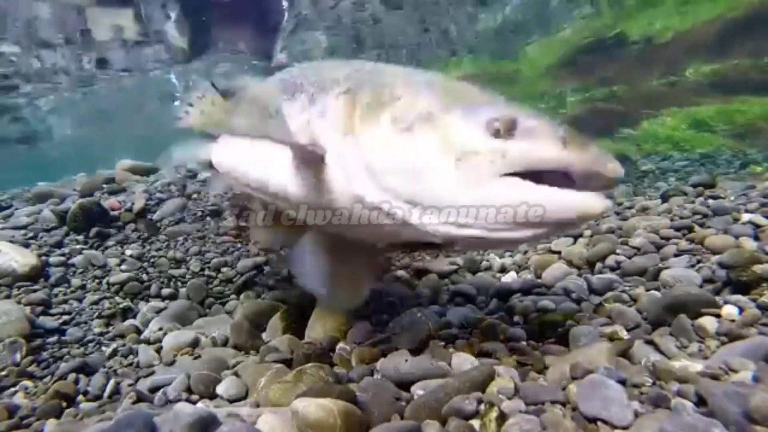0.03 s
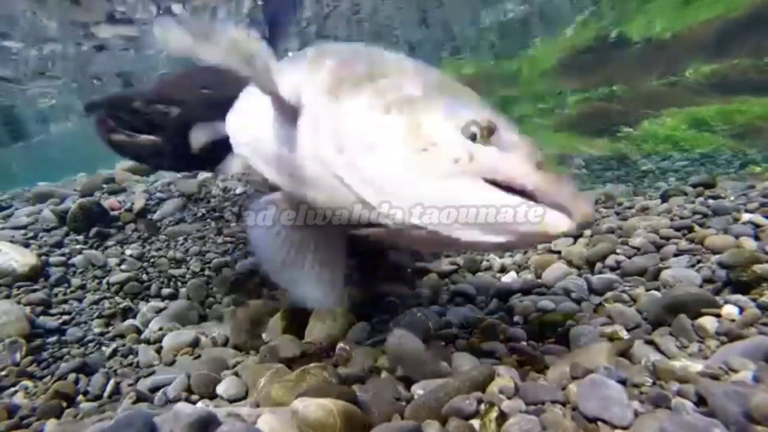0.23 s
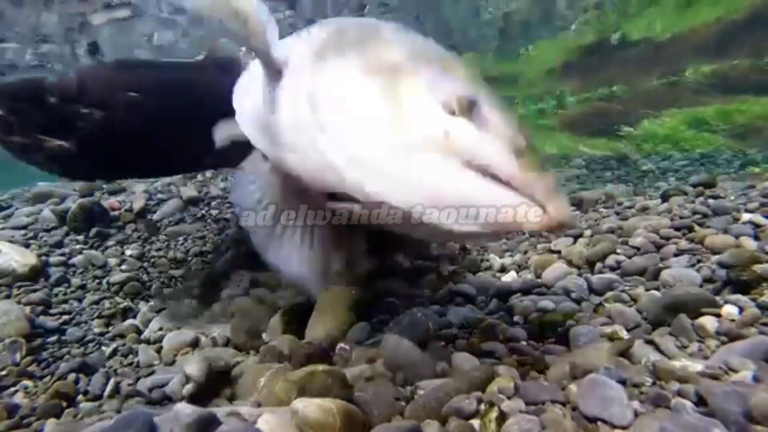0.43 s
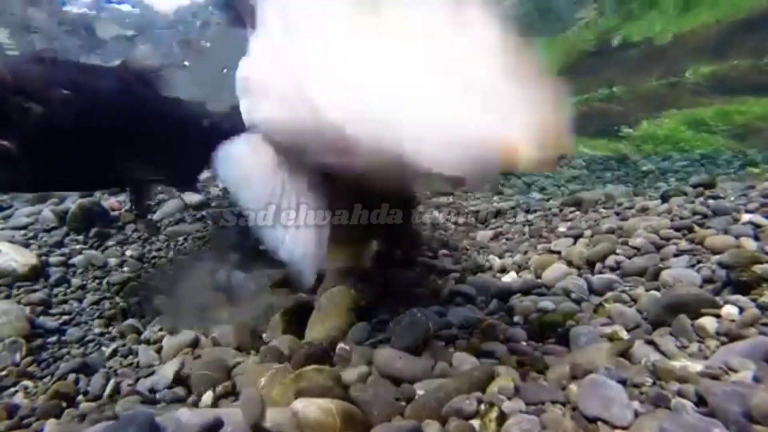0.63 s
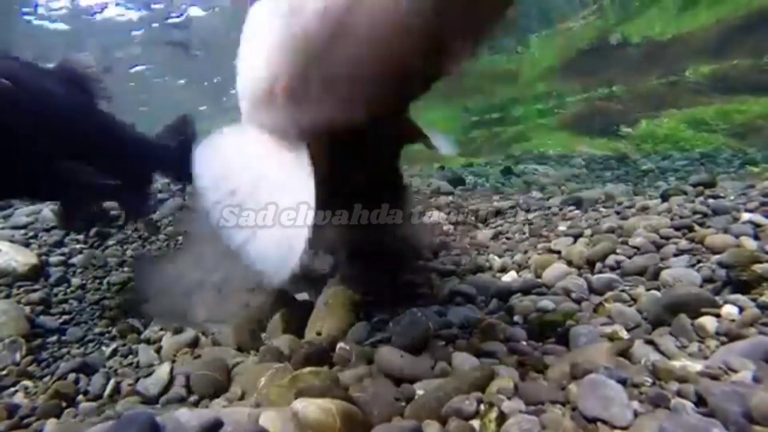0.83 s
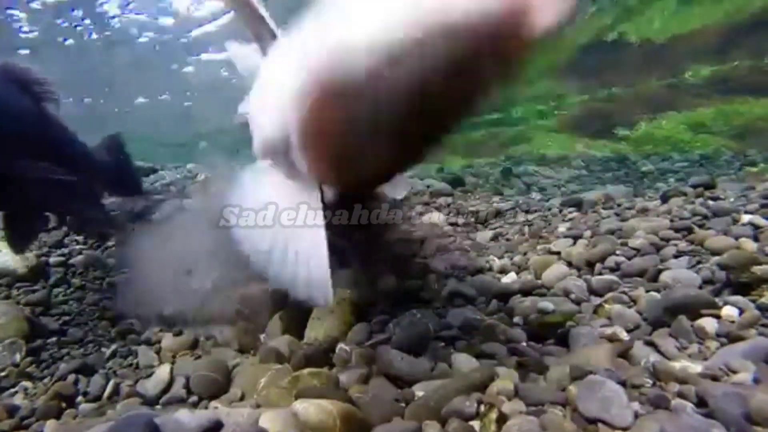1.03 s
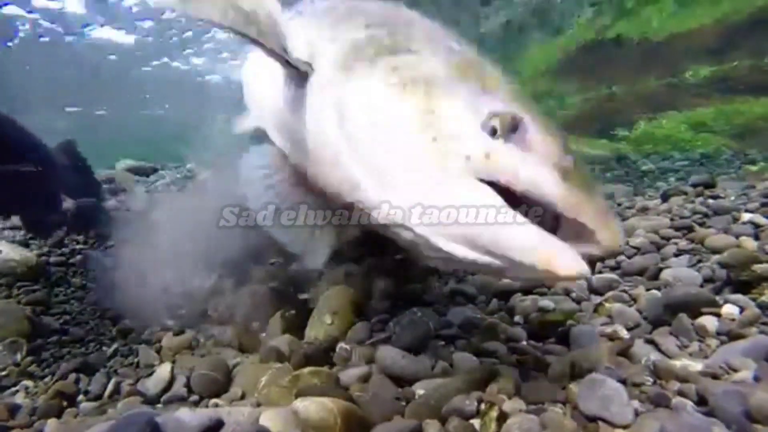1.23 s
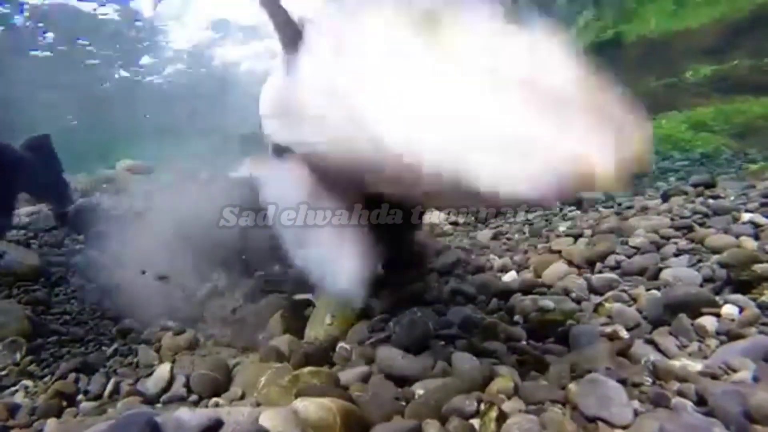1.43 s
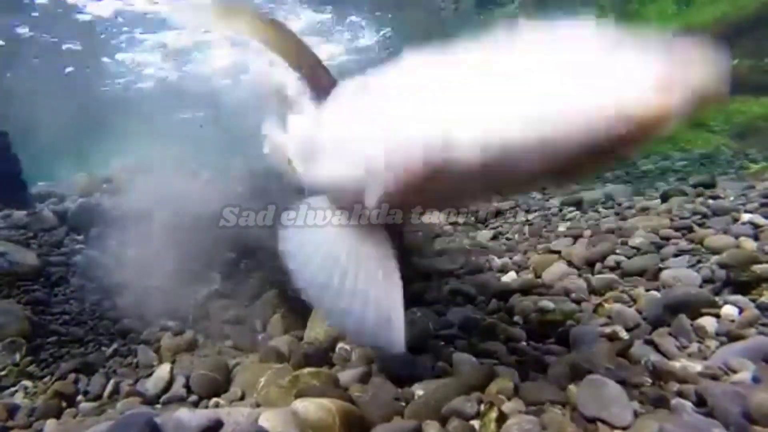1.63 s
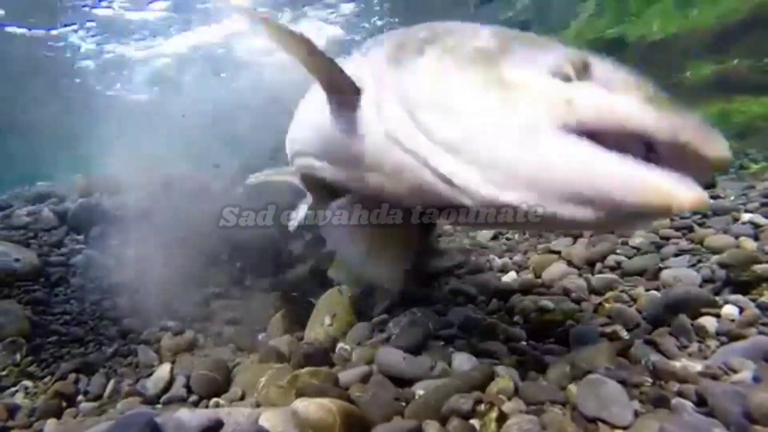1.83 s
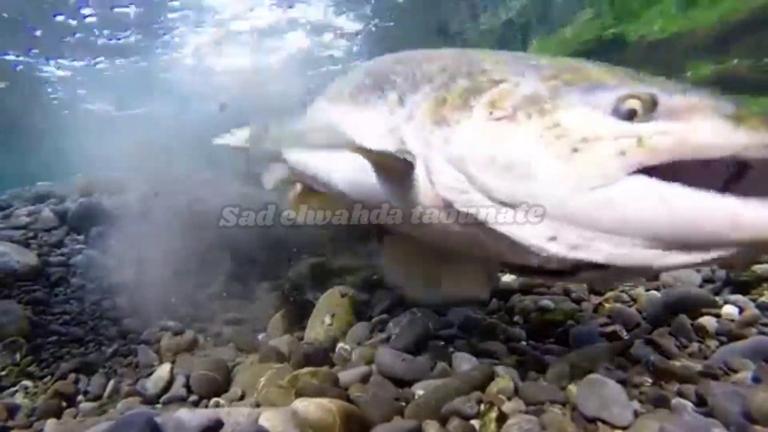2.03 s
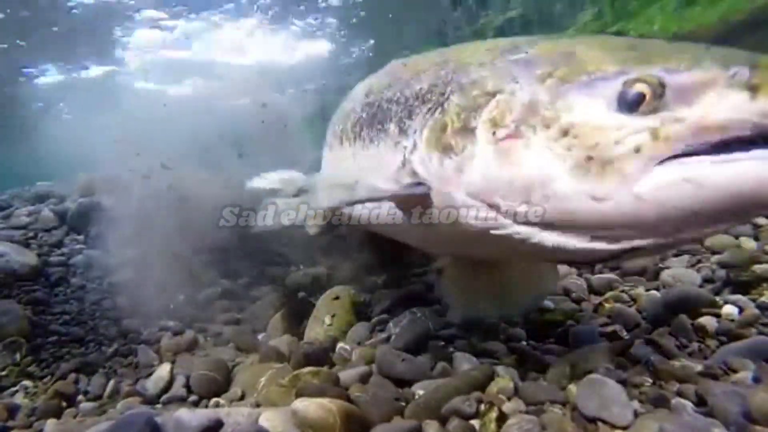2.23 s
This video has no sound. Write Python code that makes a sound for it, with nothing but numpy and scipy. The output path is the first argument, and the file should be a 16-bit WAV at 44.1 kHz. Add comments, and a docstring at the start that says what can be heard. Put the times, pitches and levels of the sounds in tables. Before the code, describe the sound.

Pebbles clacking and crunching underwater as a big fish beats its tail over them.

```python
"""A soft river rumble and shifting gravel, heard under water through a sealed camera housing.
A big fish beats its tail over the pebble bed. Each beat pushes a low surge past the housing and
stirs the gravel: fine grit rustles and ticks, a few heavy stones knock, pebbles clack.
Pebbles and grit ring the housing's resonances; the heavy stones have two hollow modes of their own.
Now and then a bubble blips over a faint gurgle."""
import sys
import numpy as np
from scipy import signal
from scipy.fft import rfft, irfft
from scipy.io import wavfile

SR = 44100
rng = np.random.default_rng(int(sys.argv[2]) if len(sys.argv) > 2 else 0)


def persist_wave(psi):
    """Save psi, clipped to +-1, as 16-bit WAV."""
    counts = np.round(np.clip(psi, -1, 1) * 32767).astype(np.int16)
    wavfile.write(sys.argv[1], SR, np.atleast_2d(counts).T)


N = 101429
TIME = np.arange(N) / SR


def from_db(db):
    """Decibels to gain."""
    return 10 ** (np.asarray(db) / 20)


def unit_rms(x):
    """Scale to unit rms."""
    return x / np.sqrt(np.mean(x ** 2) + 1e-20)


def curves(rows):
    """Interpolate each column after the time column to every sample."""
    time_s, *columns = np.transpose(rows)
    return [np.interp(TIME, time_s, column) for column in columns]


def filtered(x, hz, kind, order=2):
    """Causal Butterworth filter."""
    sos = signal.butter(order, np.clip(hz, 10, .45 * SR), kind, fs=SR, output="sos")
    return signal.sosfilt(sos, x + 1e-18)


def noise(hz, kind, order=2):
    """Filtered noise at unit rms."""
    return unit_rms(filtered(rng.standard_normal(N), hz, kind, order))


def ring(x, modes):
    """Parallel band-pass resonances."""
    return sum(from_db(db) * filtered(x, [hz - width_hz / 2, hz + width_hz / 2], "band")
               for hz, width_hz, db in modes)


def impulses(start_s, db):
    """One impulse per contact."""
    out = np.zeros(N)
    samples = np.clip(np.round(start_s * SR).astype(int), 0, N - 1)
    np.add.at(out, samples, from_db(db))
    return out


def grains(per_s, spread_db):
    """Random impulses, many small and a few large."""
    sizes = from_db(spread_db * np.minimum(rng.exponential(1, N), 3.4))
    signs = rng.choice([-1, 1], N)
    return sizes * signs * (rng.random(N) < per_s / SR)


def scattered(hits, spray_db, t60_s):
    """Each hit trails a short random spray of reflections off nearby stones."""
    decay = from_db(-120 / (t60_s * SR))
    power = signal.lfilter([0, 1 - decay], [1, -decay], hits ** 2 + 1e-18)
    return hits + from_db(spray_db) * np.sqrt(power) * rng.standard_normal(N)


# Each row: frequency in Hz, relative spectral density in dB.
CURRENT_SPECTRUM = [(20, -17), (40, -2), (65, 1), (130, -5.5), (200, -18), (350, -20), (900, -24.5),
                    (3000, -39), (15000, -27.5)]
# Each row: time in seconds, relative level in dB.
CURRENT_LEVELS = [(0, -3.5), (.15, -6.5), (.3, 4), (1.0, 0), (1.8, 1.5), (2.3, -6.5)]

def current(gain_db=-43.5):
    """The river rumbles softly along the housing."""
    hz, db = np.transpose(CURRENT_SPECTRUM)
    bins_hz = np.fft.rfftfreq(N, 1 / SR)
    colour = from_db(np.interp(np.log(bins_hz + 1), np.log(hz), db))
    rumble = unit_rms(irfft(colour * rfft(rng.standard_normal(N)), N))
    flow_db, = curves(CURRENT_LEVELS)
    return from_db(gain_db + flow_db) * rumble


def varied(drive, spread_db=2.5, rate_hz=95):
    """The drive of a resonance changes from contact to contact."""
    return drive * unit_rms(from_db(spread_db * noise(rate_hz, "low")))


# Each row: centre in Hz, width in Hz, gain in dB.
HOUSING_HIGH_MODES = [(3810, 240, -3.5), (4164, 264, -4.5), (4950, 384, -3.5), (6974, 1240, -8),
                      (8640, 490, -10.5), (9840, 590, -8.5), (11700, 1340, -10), (13800, 1300, -18)]

def housing_treble(drive):
    """The housing's high resonances, each struck with its own strength."""
    return sum(ring(varied(drive), [mode]) for mode in HOUSING_HIGH_MODES)


# Each row of both: centre in Hz, width in Hz, gain in dB.
HOUSING_BODY_MODES = [(680, 203, -13.5), (1406, 229, 0.5), (1634, 62, -2), (1763, 152, 3.5)]
HOUSING_MAIN_MODES = [(2503, 174, 0), (2905, 280, 0.5)]

def housing(body, lower, upper, edge):
    """The housing rings: body, lower and upper main mode, and treble, each driven separately."""
    main = ring(lower, HOUSING_MAIN_MODES[:1]) + ring(upper, HOUSING_MAIN_MODES[1:])
    return ring(body, HOUSING_BODY_MODES) + main + housing_treble(edge)


GRIT_HIGHPASS_HZ = 5500
# Each row: time in seconds, relative crunch level in dB, relative grit level in dB.
GRAVEL_LEVELS = [(0, -50, -61), (.06, -53.5, -51), (.1, -54.5, -64), (.15, -46, -46.5), (.22, -38.5, -46.5),
                 (.33, -37.5, -40), (.45, -29.5, -37.5), (.58, -29, -35.5), (.69, -31, -37.5),
                 (.77, -38.5, -42), (.88, -31, -46), (1.0, -36.5, -50.5), (1.1, -31.5, -43),
                 (1.25, -37.5, -49.5), (1.34, -34, -36.5), (1.48, -33, -43), (1.66, -34.5, -44),
                 (1.8, -34, -56), (1.92, -36.5, -37.5), (1.97, -38.5, -44), (2.06, -39, -43.5),
                 (2.3, -42, -52)]

def gravel(crunch_db, grit_db, stir_db):
    """Small stones crunch and sand rustles in spurts; harder stirring makes more contacts."""
    density = from_db(0.39 * stir_db)
    small = grains(per_s=1500 * density, spread_db=5.5) / np.sqrt(density)
    small = scattered(small, spray_db=-4.5, t60_s=0.03)
    sand = grains(per_s=2300 * density, spread_db=6.5) / np.sqrt(density)
    sand = scattered(sand, spray_db=2.0, t60_s=0.0084)
    crunch = unit_rms(housing(from_db(-6) * small, varied(small), varied(small), from_db(-9) * small))
    spurts = from_db(3.5 * noise(hz=24.5, kind="low"))
    grit = unit_rms(spurts * housing_treble(filtered(sand, GRIT_HIGHPASS_HZ, "high")))
    return from_db(crunch_db + 2.5) * crunch + from_db(grit_db + 0.5) * grit


# Each row: centre in seconds, swell in Hz, swell level in dB, churn level in dB, half length in seconds.
TAIL_BEATS = [(0.07, 35.6, -32.5, -42, 0.013), (0.256, 27, -31, -35, 0.038),
              (0.46, 26.2, -23.5, -29.5, 0.024), (0.671, 25, -26.5, -29.5, 0.032),
              (0.92, 27.4, -28, -34.5, 0.016), (1.183, 24, -30.5, -33.5, 0.024),
              (1.282, 63, -36.5, -39, 0.023), (1.467, 22, -31, -32, 0.023), (1.526, 63, -31, -38, 0.02),
              (1.839, 79, -22.5, -30, 0.011), (2.264, 71, -36, -51, 0.016)]

def tail_beats(wake_db=-11.5, wake_s=0.12, churn_hz=(52, 141)):
    """Each beat is a pressure swell with churning water and a dying wake; a quick one thumps."""
    swell, churn_power = 0, 0
    for centre_s, hz, swell_db, churn_db, half_s in TAIL_BEATS:
        t = TIME - centre_s
        push = np.exp(-.5 * (t / half_s) ** 2)
        swell -= from_db(swell_db) * push * np.cos(2 * np.pi * hz * t)
        wake = from_db(wake_db) * (t > 0) * np.exp(-np.abs(t) / wake_s)
        churn_power += from_db(churn_db) ** 2 * (push ** 2 + wake ** 2)
    eddies = noise(churn_hz, "band", order=3)
    return swell + np.sqrt(churn_power) * eddies


def gurgle(stir_db, gain_db=-50):
    """Small bubbles ring in the wake, louder as the gravel is stirred harder."""
    pitches_hz = np.geomspace(534.5, 767, 10)
    per_s, width_hz = 1200 / len(pitches_hz), 85
    swarm = sum(ring(grains(per_s, spread_db=6.0), [(hz, width_hz, 0)]) for hz in pitches_hz)
    return from_db(gain_db + 0.84 * stir_db) * unit_rms(swarm)


# Each row: start in seconds, pitch in Hz, level in dB, 60 dB decay time in seconds.
BUBBLE_BLIPS = [(0.116, 2350, -20, 0.014), (.116, 614, -28.5, 0.17), (.217, 536, -31, 0.043),
                (1.376, 639, -27, 0.092), (1.428, 1790, -29, 0.039), (1.455, 505, -23.5, 0.047),
                (1.546, 1760, -16.5, 0.032), (1.838, 11300, -17.5, 0.028), (2.124, 7700, -37, .05),
                (2.193, 13100, -35, .025), (2.243, 575, -26, 0.031)]

def bubbles(attack_s=0.0019, sag=0.19, sag_s=0.015, rise_per_s=3.9):
    """Single bubbles ring: the pitch starts high, settles, then creeps up."""
    out = 0
    for start_s, hz, db, t60_s in BUBBLE_BLIPS:
        age_s = np.maximum(TIME - start_s, 0)
        settle = sag * sag_s * (1 - np.exp(-age_s / sag_s))
        creep = .5 * rise_per_s * age_s ** 2
        cycles = hz * age_s + min(hz, 767) * (settle + creep)  # high blips bend proportionally less
        envelope = (1 - np.exp(-age_s / attack_s)) * from_db(-60 * age_s / t60_s)
        out += from_db(db) * envelope * np.sin(2 * np.pi * cycles)
    return out


# Each row: start in seconds, relative level in dB.
GRIT_TICKS = [(0.1365, -36), (0.2157, -22.5), (0.3493, -29), (0.506, -24.5), (0.68, -25), (0.702, -23),
              (0.9886, -23), (1.3412, -24), (1.4113, -21), (1.461, -18), (1.5543, -21), (1.61, -17),
              (1.9031, -29.5), (1.9973, -19.5), (2.0658, -23), (2.0747, -26), (2.125, -27)]

def grit_ticks(gain_db=24.5):
    """Chips of grit tick against the housing: dry, bright, without body."""
    start_s, db = np.transpose(GRIT_TICKS)
    hits = scattered(impulses(start_s, db + gain_db), spray_db=-0.5, t60_s=0.008)
    return housing_treble(filtered(hits, GRIT_HIGHPASS_HZ, "high"))


# Each row: centre in Hz, width in Hz, gain in dB.
STONE_MODES = [(393, 210, -3), (651, 107, 3)]
# Each row: start in seconds, relative level in dB.
STONE_KNOCKS = [(.221, -27), (.628, -5), (.643, -7), (.7205, -1), (.922, -10), (1.011, -10), (1.021, -1.5),
                (1.266, -4), (1.28, -16), (1.494, -5.5), (1.816, -3.5)]

def stone_knocks(gain_db=14.5):
    """Heavy stones tip over with a hollow knock."""
    start_s, db = np.transpose(STONE_KNOCKS)
    hits = scattered(impulses(start_s, db + gain_db), spray_db=-7.5, t60_s=0.04)
    return ring(hits, STONE_MODES)


# Each row: start in seconds, relative main ring level in dB, upper over lower mode in dB,
# body over main ring in dB, edge over main ring in dB.
PEBBLE_CLACKS = [(0.2213, -24, 6, 3.5, -22), (0.2812, -19, 2, -3.5, -13.0), (0.3646, -5, 0, -8.5, -20),
                 (0.49, -19.5, 12, 8.5, -0.5), (0.5381, 0.5, 5.5, -4.5, -12.5), (0.579, -6.5, 7, -17, -12),
                 (0.5834, -9.5, 6.0, -3, -8.0), (0.6044, -2.0, 0.5, -9, -15), (0.6109, -10.5, 12, -2, -20),
                 (0.626, -9.5, 7, -13, -14.5), (0.6295, -7.5, 5, -7, -16), (0.6356, -10, 2.0, -8, -19),
                 (0.6423, -8.5, -2, 0, -23), (0.689, -8.5, 11, -8, -15.5), (0.7206, -9.5, -8, -10, -37),
                 (0.7233, -0.0, 4, -10, -28), (0.7342, -11, 7, -7, -10), (0.7458, -0.5, -0.5, -3.5, -21.0),
                 (0.7764, -12.5, 3, -4.5, -20), (0.8018, -4.0, -2, -5.5, -14.0),
                 (0.812, -14.0, -3, 0.5, -9.5), (0.8402, -2.5, 7, -7, -17), (0.8456, -7.0, 6.5, -3.5, -25),
                 (0.9232, -12.5, -2, 1.5, -30), (0.994, -12.5, 3.0, -7, -8.5), (1.0124, -14, -2, -2, -22),
                 (1.0225, -8.5, -4, -4.5, -15), (1.0611, -3.0, -1.5, -3.5, -15.5), (1.0729, -3, 3, -4, -19),
                 (1.104, -9.0, 4, -9, -14), (1.1128, -8.0, 1.5, -7.5, -17.5), (1.1584, -12.5, -2, -13, -17),
                 (1.217, -11, -2, -5, -31.5), (1.2665, -10, -6, -2, -37), (1.2803, -10.5, 0.5, -5.0, -32.5),
                 (1.3265, -21, -4.0, -5, -8), (1.3568, -12.5, -2.0, -3.5, -10.5),
                 (1.4774, -13, 5, -3.5, -8.5), (1.4874, -8.5, -8, 0, -10), (1.4916, -5, 6, -6.5, -14),
                 (1.5069, -5, -3, -6.5, -29), (1.5891, -2.5, 4, -6.5, -18.5),
                 (1.6003, -9.0, -10, -0.5, -15), (1.6164, -12.5, 2, -2.0, -4), (1.6359, -3, -2, -6.5, -11),
                 (1.6393, -16, 8, 6.5, -11), (1.685, -14, 7, -6, -14.0), (1.7099, -12.5, 6, -1.5, -7),
                 (1.721, -22, 12.0, -10, -5.5), (1.7582, -17, 11, -0.5, -6), (1.805, -16.5, 14, 1, -29),
                 (1.818, -12, 16, -5, -14.5), (1.8302, -9, 8, -10, -23), (1.9216, -25, 8, -6, -0.5),
                 (1.9406, -19.0, 5, -3.5, 0.5), (2.0149, -4, 3.5, -8, -13), (2.1509, -21.5, 1, -5, -7.5),
                 (2.281, -16.0, -5, -4, -19.0)]

def pebble_clacks(gain_db=26.5):
    """Pebbles ring the housing: beating modes near 2.5 and 2.9 kHz, a lower body, a sharp edge."""
    start_s, db, tilt_db, body_db, edge_db = np.transpose(PEBBLE_CLACKS)
    body = scattered(impulses(start_s, db + body_db), spray_db=-8, t60_s=0.019)
    lower = scattered(impulses(start_s, db - tilt_db / 2), spray_db=-6.5, t60_s=0.016)
    upper = scattered(impulses(start_s, db + tilt_db / 2), spray_db=-9, t60_s=0.021)
    edge = scattered(impulses(start_s, db + edge_db), spray_db=2.5, t60_s=0.011)
    return from_db(gain_db) * housing(body, lower, upper, edge)


# Each row: start in seconds, relative level in dB.
PEBBLE_CRACKS = [(0.3645, 3)]

def pebble_crack(band_hz=(3500, 7650)):
    """One pebble cracks close to the housing."""
    start_s, db = np.transpose(PEBBLE_CRACKS)
    burst = scattered(impulses(start_s, db), spray_db=8, t60_s=0.0099)
    return filtered(burst, band_hz, "band", order=4)


def scene():
    """Stones, water and bubbles at one microphone."""
    crunch_db, grit_db = curves(GRAVEL_LEVELS)
    stir_db = crunch_db - crunch_db.mean()
    contacts = pebble_clacks() + pebble_crack() + grit_ticks() + stone_knocks()
    bed = gravel(crunch_db, grit_db, stir_db)
    water = tail_beats() + current() + gurgle(stir_db) + bubbles()
    return (contacts + bed + water)[None]


def record(dry):
    """Soft clipping rounds the loudest peaks; a steep low-pass cuts the top."""
    ceiling, cutoff_hz = 0.95, 15200
    rounded = dry / (1 + (dry / ceiling) ** 6) ** (1 / 6)
    lowpass = signal.ellip(10, .2, 80, cutoff_hz, fs=SR, output="sos")
    return signal.sosfilt(lowpass, rounded)


dry = scene()
out = record(dry)
persist_wave(out)
```